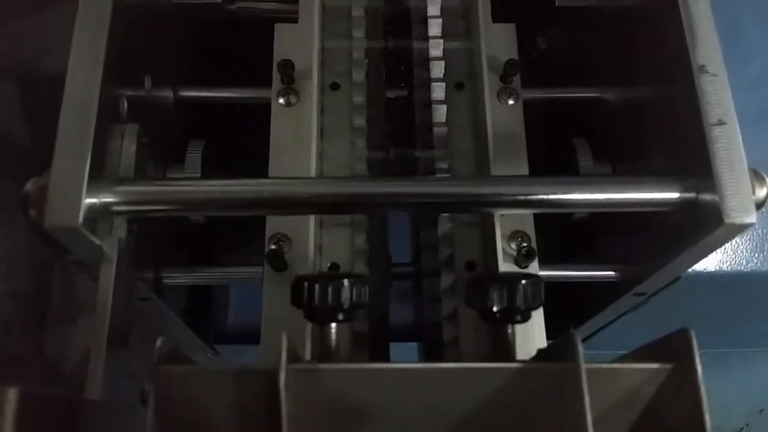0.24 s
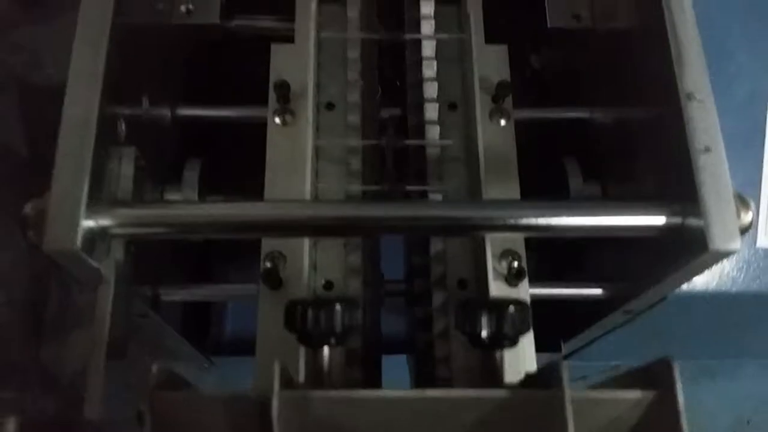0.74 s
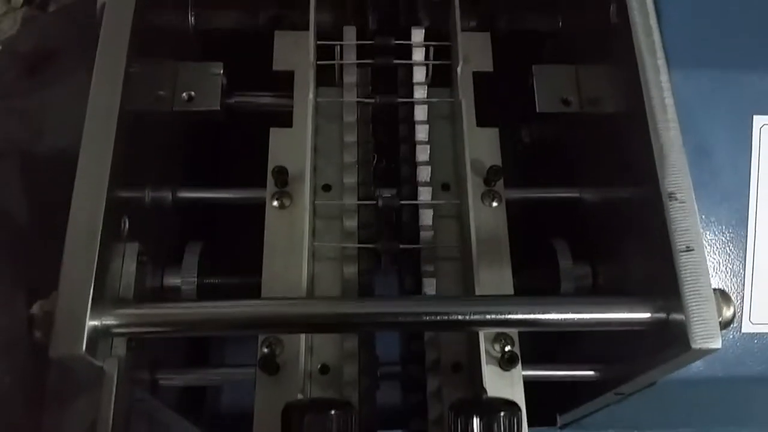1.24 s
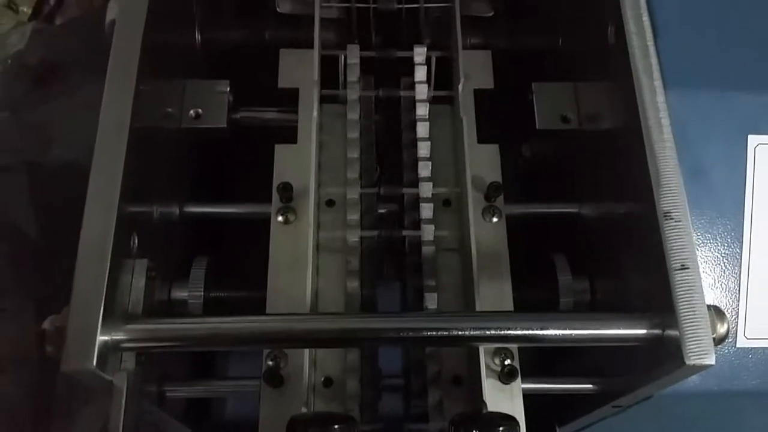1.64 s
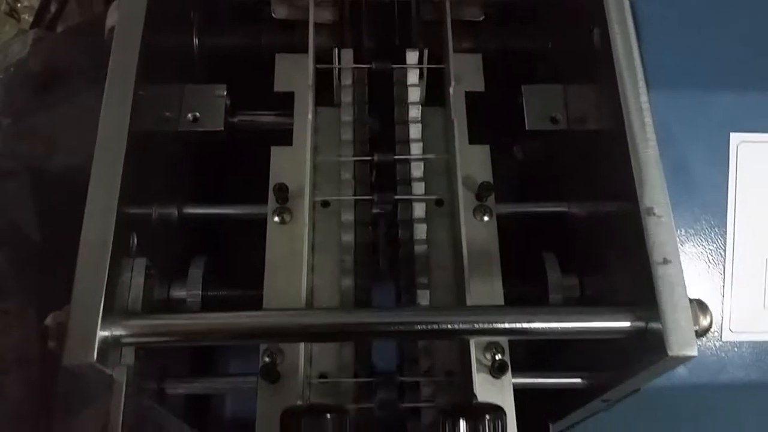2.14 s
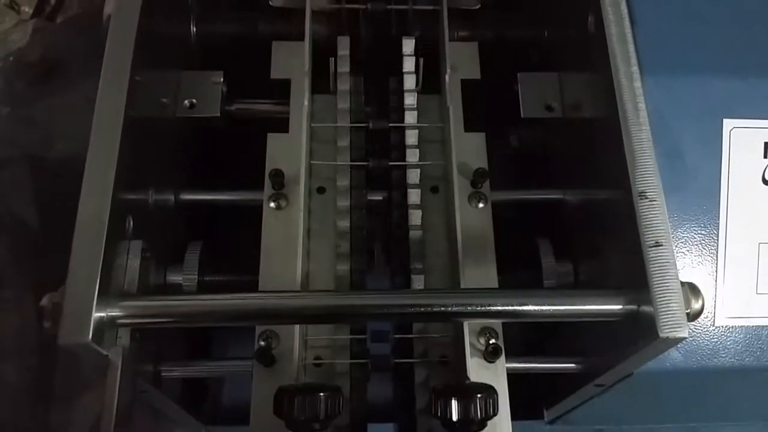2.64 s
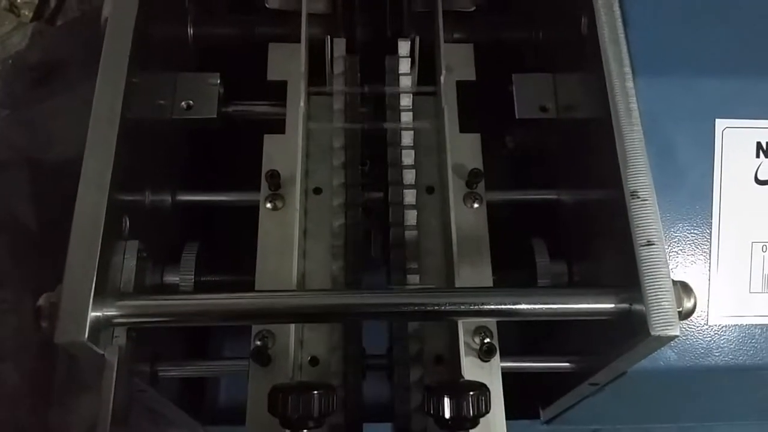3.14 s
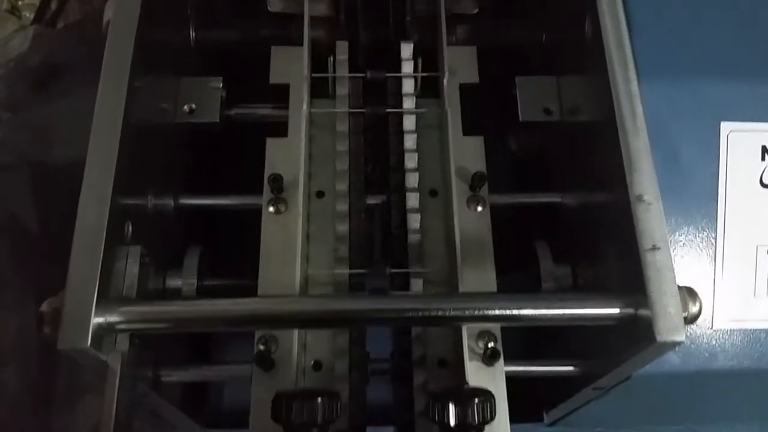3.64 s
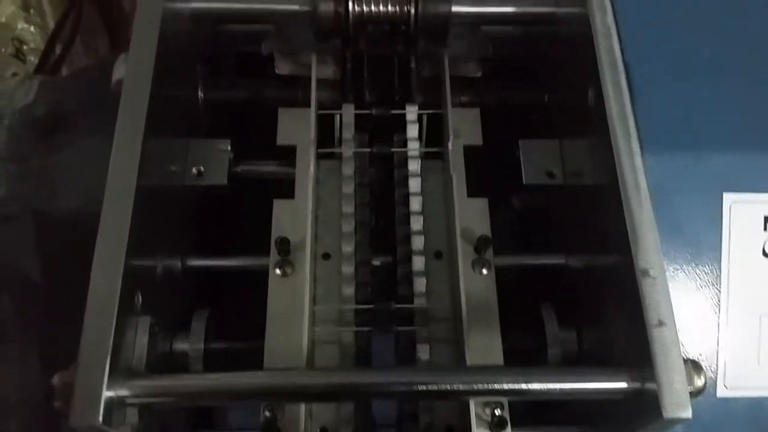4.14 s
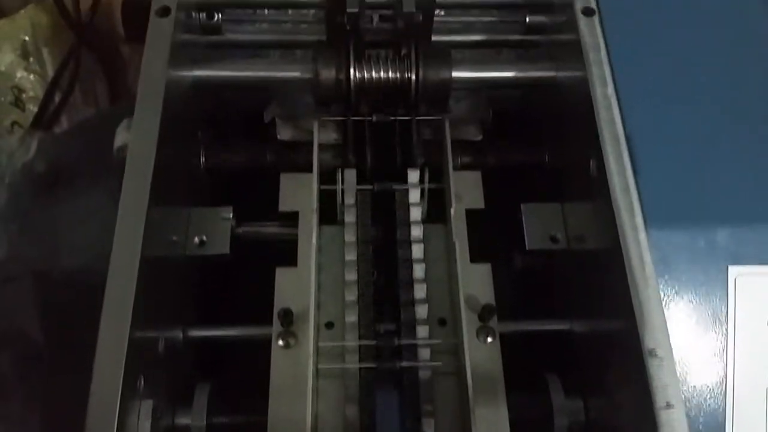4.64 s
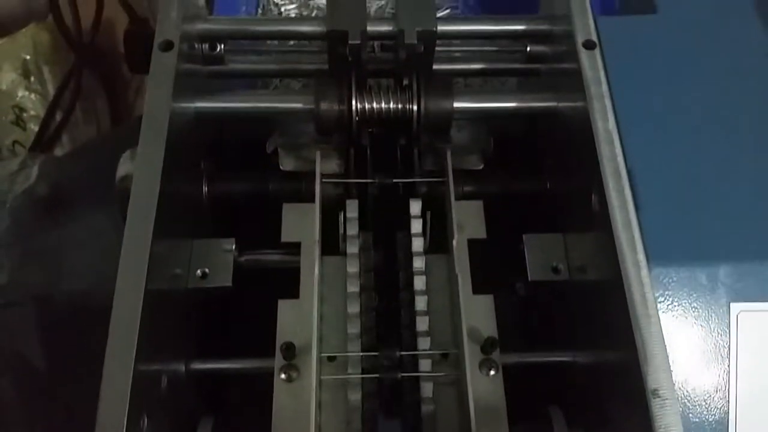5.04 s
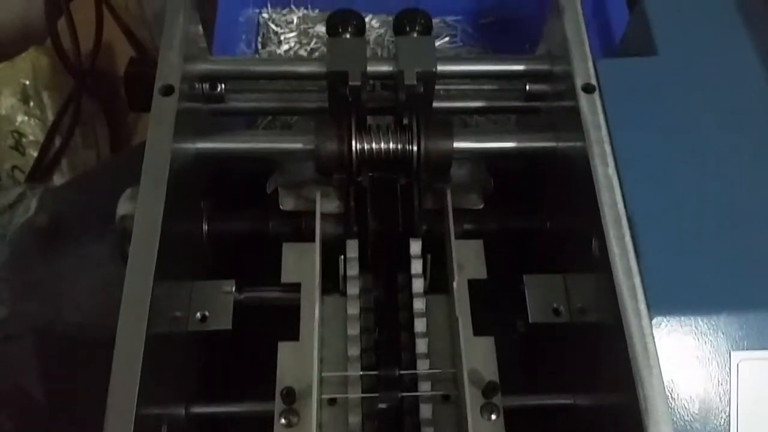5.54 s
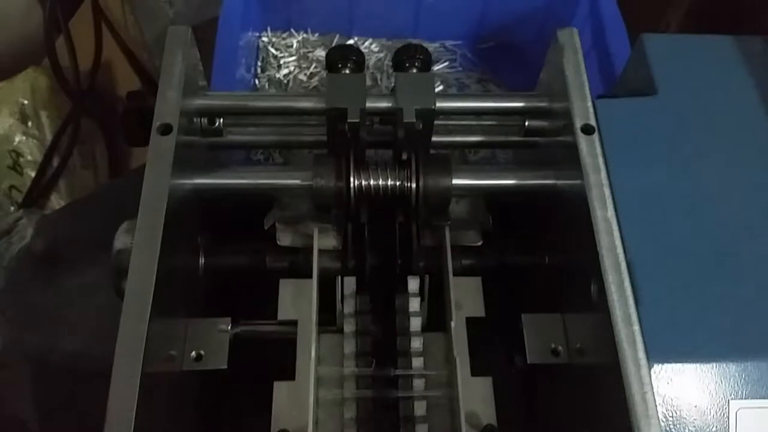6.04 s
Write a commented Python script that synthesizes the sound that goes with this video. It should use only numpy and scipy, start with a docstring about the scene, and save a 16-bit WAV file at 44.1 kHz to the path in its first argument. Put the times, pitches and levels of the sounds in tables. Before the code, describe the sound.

In a small workshop, a vibratory feeder gives a constant mains hum, fast ticking and bright sizzle. A lead-forming machine knocks in uneven double thumps about three times a second. Two early bursts of ringing metal clangs and sharp clinks bring a bouncing pin and clattering leads; the steady buzz dips after each and climbs back. Later clinks are sparser. Close hand-held phone stereo with a short room tail.

```python
"""A steady mains hum with a tick per cycle and bright sizzle, under heavy thumps, ringing clangs and sharp
clinks. A vibratory feeder in a workshop: mains harmonics hum, armature modes tick, shaped noise sizzles in the
bowl. A lead-forming machine knocks the frame's modes; wire-lead parts ring rail, plate, a small clip and each
other. A short pin bounces and leads clatter. The steady sound dips twice near loud clinks and climbs back. A
hand-held phone hears it with two ports, unlike in colour; a grip rumble comes once."""
import sys
import numpy as np
from scipy import signal
from scipy.fft import rfft, irfft
from scipy.io import wavfile
from scipy.ndimage import uniform_filter1d

SR = 44100
rng = np.random.default_rng(int(sys.argv[2]) if len(sys.argv) > 2 else 0)


def ratio(d):
    """dB to gain"""
    e = np.asarray(d, float) / 20
    return 10 ** e


def wav_record(signal):
    """Record a signal, one row per channel, as 16-bit PCM in the file named by sys.argv[1]."""
    frames = np.transpose(np.atleast_2d(signal))
    bounded = np.clip(frames, -1, 1)
    # unit amplitude maps onto the largest positive 16-bit level
    quanta = np.round(bounded * 32767).astype(np.int16)
    wavfile.write(sys.argv[1], SR, quanta)


N = 277389
T = np.arange(N) / SR
HZ = np.fft.rfftfreq(N, 1 / SR)
MAINS_HZ = 49.997
LEFT_LAG_S = -0.000396  # negative: left port leads

# steel frame modes: [f/Hz, relative level/dB, free t60/s]
FRAME_MODES = [(173.7, -8.5, 0.63), (250.1, 0, 0.32), (278, 4, 0.32), (321, -4.5, 0.057),
               (645.4, -10, 0.13), (771.6, -11, 0.17)]


def unit(x):
    """Scale to rms 1."""
    return x / np.sqrt(np.mean(x ** 2))


def over_hz(table):
    """Interpolate a (f/Hz, value) table over HZ, linear on a log-f axis."""
    hz, value = np.transpose(table)
    return np.interp(np.log(HZ + 1), np.log(hz), value)


def band(x, lo_hz, hi_hz):
    """Butterworth band-pass."""
    return signal.sosfilt(signal.butter(2, [lo_hz, hi_hz], "bandpass", fs=SR, output="sos"), x)


def walk(rate_hz):
    """Random levels held 1 / rate_hz and slewed twice."""
    k = int(SR / rate_hz)
    held = np.repeat(rng.standard_normal(N // k + 1), k)
    return uniform_filter1d(uniform_filter1d(held, k), k)[:N]


def ring(pulses, hz, t60_s):
    """One decaying mode as a two-pole resonator, about peak 1 for a unit pulse."""
    r = np.exp(-np.log(1000) / (t60_s * SR))
    w = 2 * np.pi * hz / SR
    return signal.lfilter([np.sin(w)], [1, -2 * r * np.cos(w), r * r], pulses)


def strike(modes, s, db, scatter_db, same_face=False):
    """Blows into a set of modes; each blow lands elsewhere, so it rings them in other shares."""
    chance = rng.standard_normal((len(s), len(modes)))
    at = (np.asarray(s) * SR).astype(int)
    out = 0
    for k, (hz, mode_db, t60_s) in enumerate(modes):
        sign = 1 if same_face else np.sign(chance[:, k - 1])
        size = sign * ratio(db + mode_db + scatter_db * chance[:, k])
        out = out + ring(np.bincount(at, size, N)[:N], hz, t60_s)
    return out


def burst(s, db, t60_s, lo_hz, hi_hz=SR, rise_s=0.0017, channels=1):
    """Band noise under a decaying envelope at each blow."""
    fall = np.exp(-np.log(1000) / (t60_s * SR))
    pulses = np.bincount((np.asarray(s) * SR).astype(int), ratio(db), N)[:N]
    shape = signal.lfilter([1], [1, -fall], pulses)
    shape = uniform_filter1d(shape, int(rise_s * SR) + 1)
    return shape * unit(band(rng.standard_normal((channels, N)), lo_hz, min(hi_hz, .45 * SR)))


def add(out, s, hz, db, t60_s, shape=1):
    """Add decaying modes (columns) to out at s; each port hears them in its own shares and phases."""
    tail = T[:np.size(shape) if np.ndim(shape) else int(SR * np.max(t60_s))]
    chance = rng.standard_normal((2, 2, len(hz), 1))
    size = ratio(db + 0.5 * chance[0]) * 1000. ** (-tail / t60_s)
    # left port leads by about a quarter cycle
    phase = np.pi / 2 * np.array([[[1]], [[0]]]) + 0.6 * chance[1]
    at = int(s * SR)
    out[:, at:at + len(tail)] += shape * np.sum(size * np.sin(2 * np.pi * hz * tail + phase), axis=1)


def from_left(x):
    """Two ports from one source: the wave reaches the left port earlier."""
    return np.array([np.roll(x, int(LEFT_LAG_S * SR)), x])


def room(dry, t60_s=0.61, wet_db=-14):
    """Diffuse exponential noise tail, independent in the two ports."""
    n = int(.6 * SR)
    tail = rng.standard_normal((2, n)) * 1000. ** (-T[:n] / t60_s)
    tail = tail / np.sqrt(np.sum(tail ** 2, axis=1, keepdims=True))
    return dry + ratio(wet_db) * signal.fftconvolve(dry, tail, axes=1)[:, :N]


def grip():
    """Fingers shift on the phone: low rumble through the case, unlike in each port; swells, holds, fades."""
    start_s, hold_s, edge_s, level_db = 0.37, 0.222, 0.037, -20
    end_s = start_s + hold_s + edge_s
    shape = np.clip(np.minimum(T - start_s, end_s - T) / edge_s, 0, 1)
    port_db = level_db + np.array([[-2], [2.5]])
    return shape * ratio(port_db) * unit(band(rng.standard_normal((2, N)), 51, 115))


def hum():
    """Magnet and springs: mains multiples peak together at the stroke; all but the second waver most."""
    # [multiple of mains, relative level/dB]
    harmonics = [(1, -24.5), (2, -1), (3, -16.5), (4, -13.5), (5, -7), (7, -13.5), (8, -19.5)]
    stroke_s = 0.007145
    t = T - stroke_s + 0.00018 * np.array([[1], [-1]])  # ports a little apart
    out = 0
    for k, db in harmonics:
        waver_db = (.3 if k == 2 else 3) * walk(13)
        out = out + np.sqrt(2) * ratio(db + waver_db) * np.cos(2 * np.pi * k * MAINS_HZ * t)
    return out


def ticks():
    """The armature taps once a mains cycle and rings its modes; even in time, uneven in strength."""
    # [f/Hz, relative level/dB, t60/s]
    armature = [(1054.6, 8, 0.13), (1700, 6.5, 0.12), (2135, 26, 0.014), (2650, 7.5, 0.079),
                (4370, 13, 0.033), (4790, 8.5, 0.068), (5480, 7.5, .08)]
    first_s = .0045
    s = first_s + np.arange(int(N / SR * MAINS_HZ)) / MAINS_HZ
    pulses = np.bincount((s * SR).astype(int), ratio(1.2 * rng.standard_normal(len(s))), N)[:N]
    return unit(sum(ratio(db) * ring(pulses, hz, t60_s) for hz, db, t60_s in armature))


def bowl():
    """Dense sizzle of parts as shaped noise; the treble throbs at mains rate, every band flickers."""
    # bowl and room noise: [f/Hz, relative density/dB per Hz]
    spectrum = [(30, -36), (48, -21), (101, -5.5), (146, -3.5), (271, -6), (443, -13), (783, -12.5),
                (1460, -19), (2150, -11), (3010, -17.5), (6900, -20.5), (8000, -19.5), (14600, -18)]
    # shared part of the two ports: [f/Hz, likeness 0-1]
    likeness = [(60, 0.71), (290, 1), (640, 0.29), (1400, 0.076), (3000, 0.12)]
    like = np.clip(over_hz(likeness), 0, 1)
    shared, left, right = rfft(rng.standard_normal((3, N)))
    lag = np.exp(-2j * np.pi * HZ * LEFT_LAG_S * (HZ > 950))
    pair = np.sqrt(like) * shared * np.array([lag, lag ** 0])
    pair = pair + np.sqrt(1 - like) * np.array([left, right])
    pair = pair * ratio(over_hz(spectrum))
    throb_db = 1.67 * np.cos(2 * np.pi * MAINS_HZ * (T - .013))
    swell = walk(40)  # common to all bands
    edges_hz = [0, 150, 400, 1000, 2500, 6000, 10000, SR]
    out = 0
    for lo, hi in zip(edges_hz, edges_hz[1:]):
        flicker_db = 1.7 * swell + 2.06 * walk(30) + throb_db * (lo > 900)
        out = out + ratio(flicker_db) * irfft(pair * ((HZ >= lo) & (HZ < hi)), N)
    return unit(out)


def jostle(count=160):
    """Hopping parts tap the bowl wall and ring high modes at random times, drawn separately per port."""
    # [f/Hz, relative level/dB, t60/s]
    wall_modes = [(12800, -2, 0.25), (13200, 15, .3)]
    chance = rng.random((2, count, 2))
    ports = [strike(wall_modes, c[:, 0] * T[-1], -8 * np.log10(c[:, 1] + 0.043), 6.0) for c in chance]
    return unit(np.array(ports))


def shudder(count=260):
    """Small irregular knocks keep the frame modes ringing."""
    chance = rng.random((count, 2))
    return unit(strike(FRAME_MODES, chance[:, 0] * T[-1], -9 * np.log10(chance[:, 1] + 0.095), 3.3))


def steady_db():
    """Level of the steady sound: falls, stays low, climbs back; the deepest dip in force sets it."""
    # [t/s, depth/dB, stays low/s]
    dips = [(1.307, 7.5, 0.82), (2.774, 9, 0.9)]
    level_db, fall_s, climb_db_per_s = -23, 0.028, 16.5
    s, depth_db, low_s = np.transpose(dips)[:, :, None]
    fall_db = depth_db * (T - s + fall_s / 2) / fall_s
    climb_db = depth_db - climb_db_per_s * (T - s - low_s)
    return level_db - np.clip(np.minimum(fall_db, climb_db), 0, depth_db).max(axis=0)


def clatter():
    """Tumbling leads: tiny bright ticks at random moments, each a faint cluster of short rings."""
    # [start/s, length/s, relative level/dB]
    spells = [(0.949, 0.64, -25), (2.392, 0.31, -23.5), (2.78, .5, -25.5), (4.903, 0.85, -36)]
    ticks_per_s = 150
    out = np.zeros((2, N))
    for start_s, length_s, db in spells:
        for when, weak, *pitch in rng.random((round(ticks_per_s * length_s), 10)):
            hz = 6000 + 8500 * np.sqrt(pitch)[:, None]
            tick_db = db - 12.0 - 11 * np.log10(weak + 0.088)
            add(out, start_s + length_s * when, hz, tick_db, 0.024 * 12000 / hz)
    return out


def pin():
    """A short steel pin rings high and short at each bounce, with a small noise tick."""
    # [f/Hz, relative level/dB, t60/s]
    pin_modes = [(12250, -7, 0.052), (12560, 1, 0.055)]
    # [t/s, relative level/dB]
    bounces = [(1.263, -15), (1.4423, -12), (1.5465, -9), (2.768, -15), (2.7858, -24), (2.8055, -11),
               (2.8577, -19), (2.8764, -14), (2.951, -19), (2.9969, -18), (3.028, -18), (3.056, -20),
               (3.068, -18), (3.1385, -22), (3.1607, -17), (3.237, -18), (3.274, -24.5)]
    out = np.zeros((2, N))
    hz, mode_db, t60_s = np.transpose(pin_modes)[:, :, None]
    for s, db in bounces:
        add(out, s, hz, db + mode_db + 1.3 * rng.standard_normal(hz.shape), t60_s)
    s, db = np.transpose(bounces)
    return out + burst(s, db - 8.5, 0.15, 3600, channels=2)


def clangs(free_s=0.12):
    """Parts drop on rail and plate, and late on a small clip; the ring is choked when the part settles, or
    lands again."""
    # modes: [f/Hz, relative level/dB, free t60/s]
    rail, plate, clip_modes = [(1275, -16, 0.9), (2280, -4, 0.6), (3512, -9.5, 0.22), (3950, -8.5, 0.41),
                          (4104, -10, 0.83), (4350, -13, 0.41), (4820, -6.5, 0.45), (5040, -9, 0.5),
                          (5772, -4.5, 0.29), (9160, 1, 0.099), (10300, -3, .08), (11400, -3, .08),
                          (12800, -5, .06), (14100, -1, .05)], [(2064, -5, 0.14), (3385, -11, 0.15), (4436, -12, 0.14),
                                        (5150, -10, 0.2)], [(4485, -4, 0.17), (5500, -3, 0.2), (5830, -2, 0.23),
                                                       (6430, -2, .2), (7320, -13, 0.33)]
    # hits: [t/s, relative level/dB, best rung f/Hz]
    rail_hits, plate_hits, clip_hits = [(0.9433, -19.5, 5772), (0.9802, -22, 3950), (1.025, -12.5, 4820),
                                         (1.0674, -17.5, 5772), (1.1163, -21, 10300), (1.167, -19, 4104),
                                         (1.235, -22.5, 3880), (2.3935, -19.5, 4820), (2.4583, -13.5, 5000),
                                         (2.5127, -13, 4820), (2.59, -18.5, 5040), (2.65, -27, 4104),
                                         (2.766, -23, 3512)], [(1.3399, -13, 4436), (1.3594, -16.5, 5150),
                                                            (2.8195, -9, 5150), (2.8574, -16, 3385),
                                                            (2.9517, -16, 4436), (3.4196, -25, 2064)], [(4.9213, -26, 5830),
                                                                                (4.949, -25, 4485),
                                                                                (5.636, -25, 7320),
                                                                                (5.668, -24.5, 4485),
                                                                                (5.7365, -25, 5500)]
    out = np.zeros((2, N))
    for modes, hits in ((rail, rail_hits), (plate, plate_hits), (clip_modes, clip_hits)):
        hz, mode_db, t60_s = np.transpose(modes)[:, :, None]
        s, db, best_hz = np.transpose(hits)
        for k, gap_s in enumerate(np.diff(s, append=T[-1])):
            choked_s = np.maximum(T[:SR // 4] - min(free_s, gap_s), 0)
            choke = 0.5 + 0.95 * np.exp(-choked_s / 0.0091)
            # where the part lands decides which modes speak most
            spot_db = 9.1 * np.exp(-(np.log2(hz / best_hz[k]) / 0.064) ** 2)
            spot_db += 2.6 * rng.standard_normal(hz.shape)
            spot_db += 0.9 * (db[k] + 16) * (hz < 2500)  # harder blows favour the lowest modes
            add(out, s[k], hz, db[k] - 10.0 + mode_db + spot_db, t60_s, choke)
        out += burst(s, db - 4, 0.055, 1650, channels=2)
    # the loose part keeps touching, so the ring flutters
    return out * ratio(3.8 * walk(130))


def clinks(count=3):
    """Parts clink together: a crack, a strong close pair of rings, weak ones, and smaller bounces."""
    # [t/s, relative level/dB, strongest ring f/Hz, crack re clink/dB]
    clink_table = [(1.3137, 3, 9000, -4), (1.442, -5.5, 10500, 4.5), (1.6185, -10, 8140, 10.5),
                   (2.1903, -13, 12250, 9.5), (2.8057, 1.5, 8840, -2), (2.8787, -3.5, 11100, -8),
                   (3.089, -16.5, 6700, 14.5), (3.772, -21.5, 8900, 15), (5.055, -5, 10700, -13),
                   (5.405, -8.5, 11760, -8), (5.671, -10, 9950, 6), (5.7054, -10.5, 7800, -3)]
    share_db = np.array([-12, -15] + 10 * [-16])[:, None]
    uneven_db = 10 * (share_db < share_db[1])
    out = np.zeros((2, N))
    for s, db, ring_hz, _ in clink_table:
        chance = rng.random((count, 3, 12, 1))
        hz = 5600 + 8900 * chance[0, 1]
        hz[:2] = ring_hz * np.array([[1], [1.012]])
        t60_s = 0.039 * np.sqrt(12000 / hz)  # lower modes lose their energy more slowly
        for k, (when, _, weak) in enumerate(chance):
            bounce = k > 0
            ring_db = db + share_db - uneven_db * weak - 12 * bounce
            add(out, s + 0.12 * when[0, 0] * bounce, hz, ring_db, t60_s)
    s, db, _, crack_db = np.transpose(clink_table)
    return out + burst(s, db + crack_db - 17.0, 0.079, 1700, channels=2)


def thumps():
    """Forming machine, two blows a cycle, plus strays: a push of a few ms rings the frame; covers rattle."""
    # one row per cycle: [first blow relative level/dB, second blow relative level/dB]
    strokes = [(-26, -9.5), (-21, -6), (-1, -1.5), (-7, -10), (-7.5, -16), (-8.5, -7), (-36, -30),
               (-7, -7.5), (-35, -40), (-27, -14.5), (-22, -11), (-14, -7.5), (-1.5, -2), (-32, -26),
               (0, -25), (-14, -20), (-17, -11)]
    # stray blows on the frame: [t/s, relative level/dB]
    strays = [(0.114, -8.5), (5.113, -10), (5.451, -7.5), (5.493, -14)]
    first_cycle_s, cycle_s, second_blow_s = .368, .3577, .03
    rattle_db, rattle_again_db = -17, -12  # under a first or stray blow; under a second blow
    ring_share = 0.6  # the closed tool damps the frame: share of free t60
    (first_db, second_db), (stray_s, stray_db) = np.transpose(strokes), np.transpose(strays)
    first_s = first_cycle_s + cycle_s * np.arange(len(strokes))
    s = np.r_[first_s, first_s + second_blow_s, stray_s]
    db = np.r_[first_db, second_db, stray_db]
    # both rattles of a cycle follow its first blow's level
    knock_db = np.r_[first_db + rattle_db, first_db + rattle_again_db, stray_db + rattle_db]
    push = signal.windows.hann(110)
    damped = np.multiply(FRAME_MODES, [1, 1, ring_share])
    blow = strike(damped, s, db - 7.8, 1.6, same_face=True)
    blow = np.convolve(blow, push / push.sum())[:N]
    # the bed passes the blow on in its own narrow band
    body = 1.27 * band(blow, 242.7, 329) + band(blow, 456, 1400)
    lumps = ratio(2.8 * walk(120))
    knock = burst(s, knock_db - 8.5, 0.23, 478, 780, 0.004)
    knock = knock + burst(s, knock_db - 12.5, 0.2, 760, 1360, 0.005)
    rattle = burst(s, knock_db - 10.5, 0.25, 1050, 8100, 0.012, channels=2)
    return body + lumps * (knock + rattle)


def scene():
    """Steady feeder under its dips; blows and their room tail on top."""
    feeder = hum() + ratio(-2.5) * shudder() + ratio(-1.0) * bowl()
    feeder = feeder + from_left(ratio(-9.0) * ticks())
    feeder = feeder + ratio(-21.5 + T) * jostle()  # wall taps gain 1 dB each second
    blows = thumps() + clangs() + clinks() + pin() + clatter()
    return ratio(steady_db()) * feeder + room(blows) + grip()


def roll_off(x):
    """The treble ends steeply here."""
    return signal.sosfilt(signal.butter(12, 15680, fs=SR, output="sos"), x)


def record(dry):
    """The ports differ in colour; the loudest peaks are rounded and the top is cut steeply."""
    # [f/Hz, left minus right/dB]
    port_table = [(110, 0), (250, -3), (1700, -6), (3700, -5), (5000, -17), (6300, -11), (7900, -2),
                  (9300, 1.7)]
    tilt_db = over_hz(port_table) / 2
    ports = ratio(np.array([tilt_db, -tilt_db]))
    ports = ports / np.sqrt(np.mean(ports ** 2, axis=0))
    x = irfft(rfft(dry) * ports, N)
    x = np.tanh(0.87 * x) / 0.95
    x = signal.sosfilt(signal.ellip(10, .3, 60, 14650, fs=SR, output="sos"), x)
    return roll_off(x)


dry = scene()
out = record(dry)
wav_record(out)
```